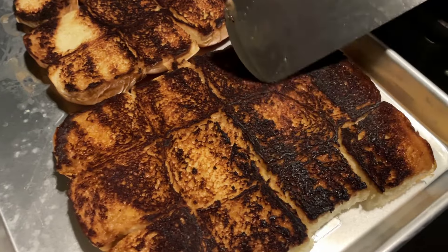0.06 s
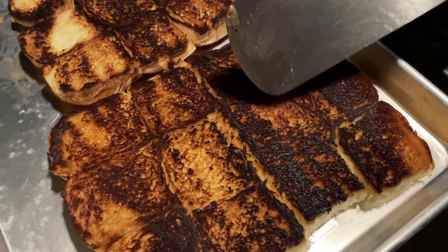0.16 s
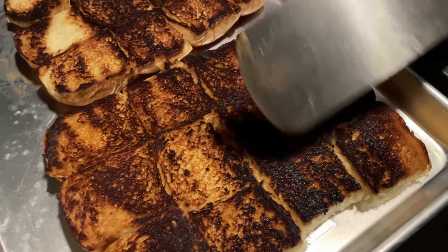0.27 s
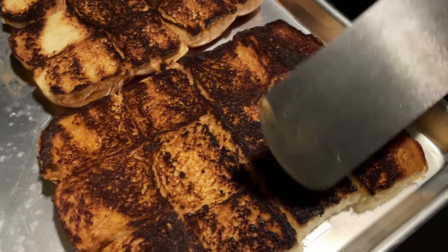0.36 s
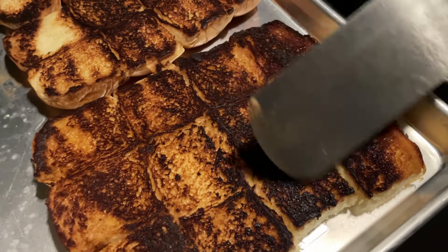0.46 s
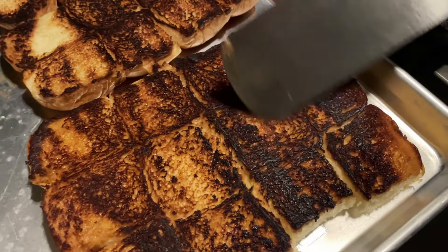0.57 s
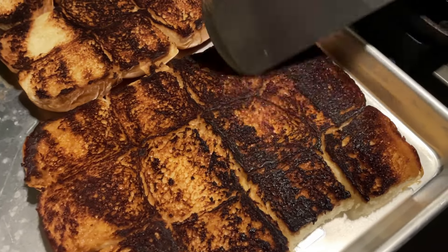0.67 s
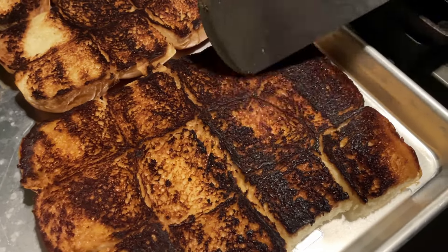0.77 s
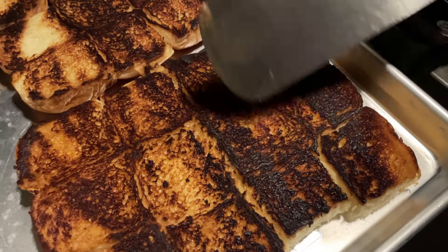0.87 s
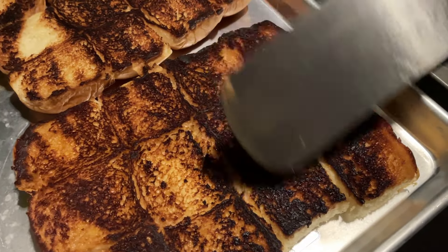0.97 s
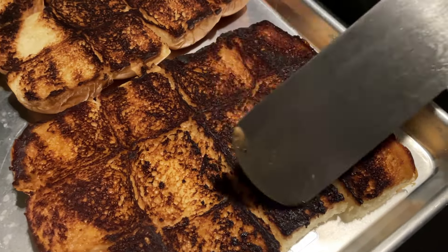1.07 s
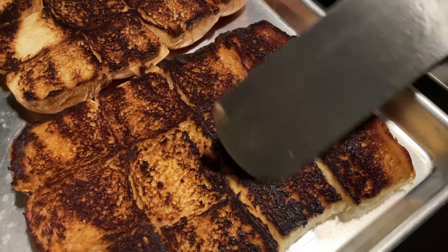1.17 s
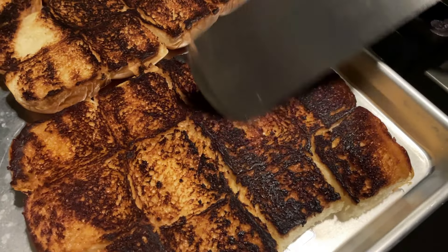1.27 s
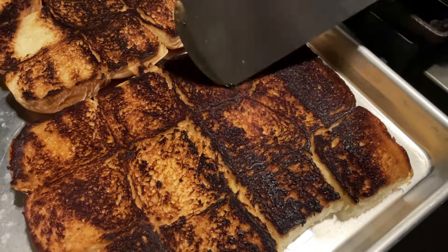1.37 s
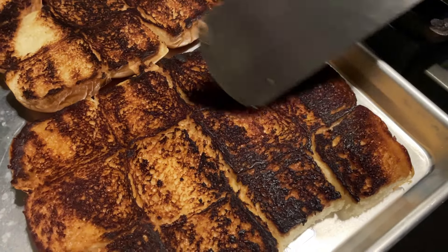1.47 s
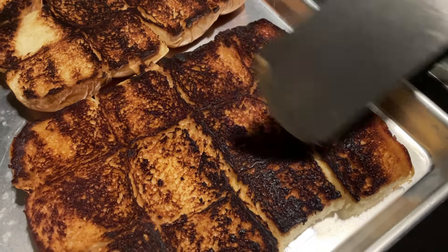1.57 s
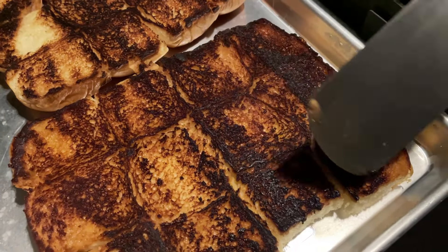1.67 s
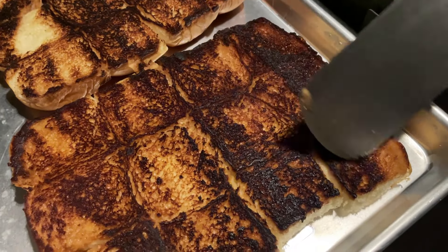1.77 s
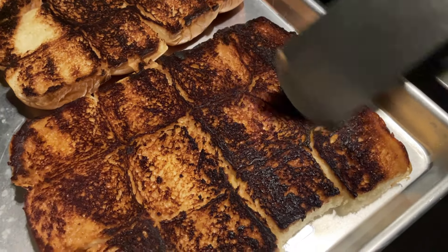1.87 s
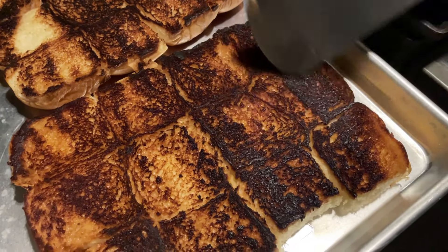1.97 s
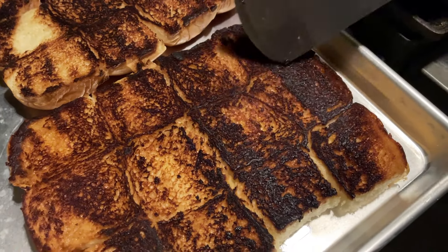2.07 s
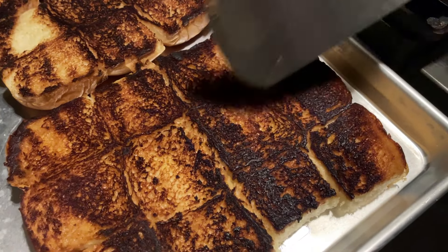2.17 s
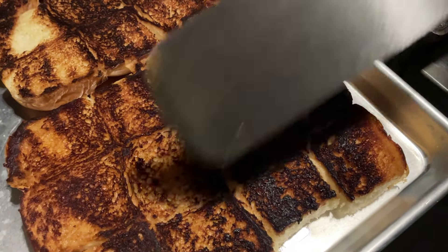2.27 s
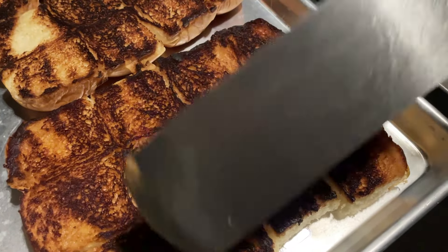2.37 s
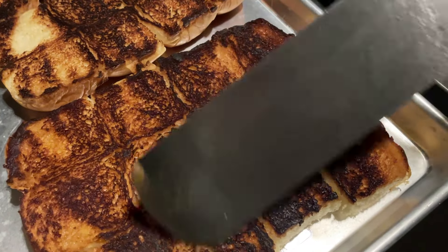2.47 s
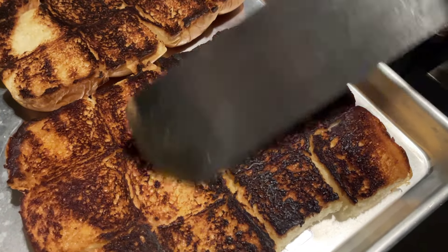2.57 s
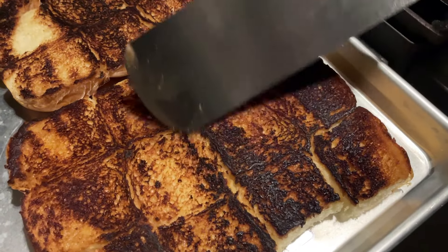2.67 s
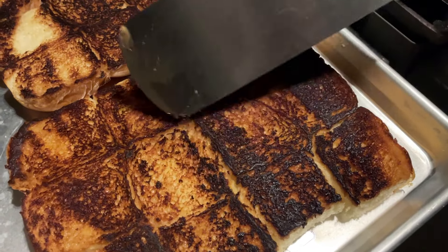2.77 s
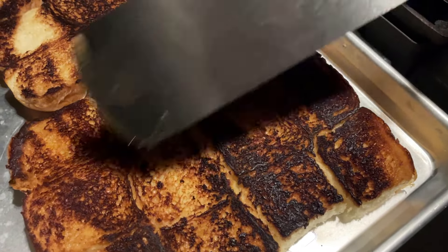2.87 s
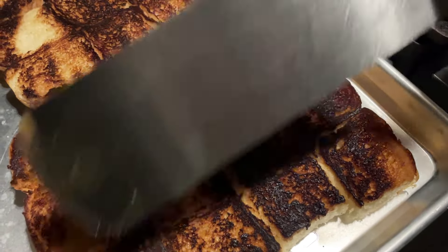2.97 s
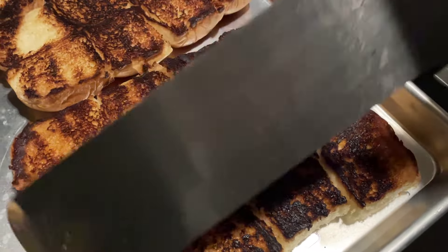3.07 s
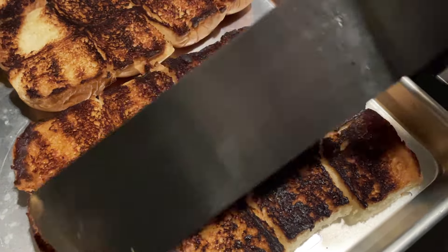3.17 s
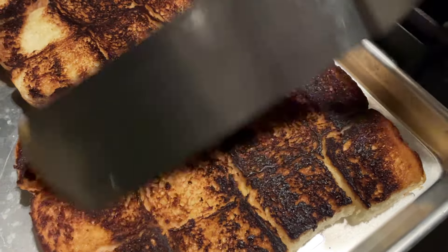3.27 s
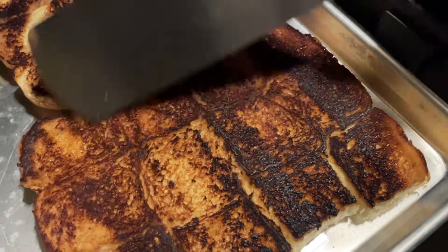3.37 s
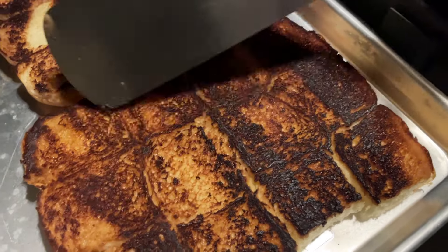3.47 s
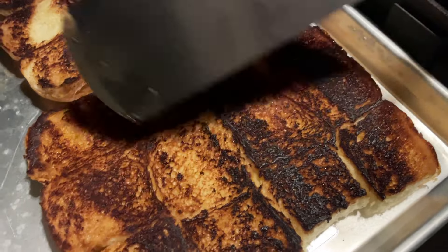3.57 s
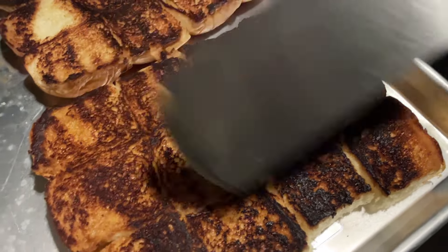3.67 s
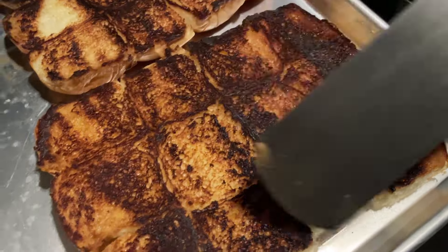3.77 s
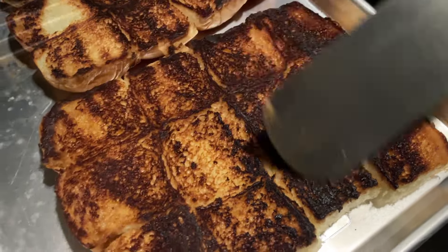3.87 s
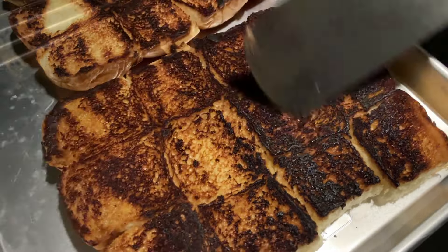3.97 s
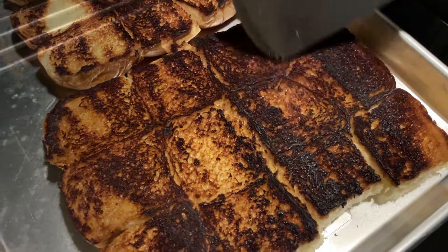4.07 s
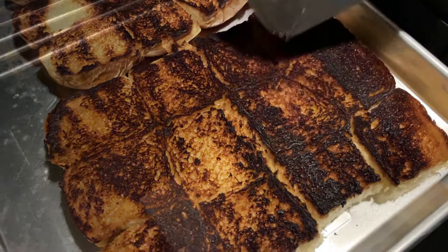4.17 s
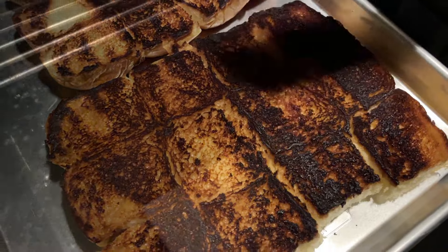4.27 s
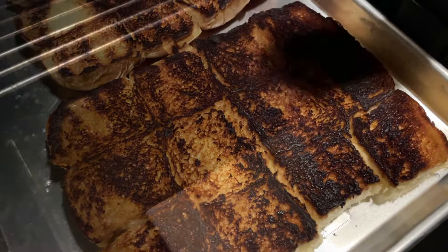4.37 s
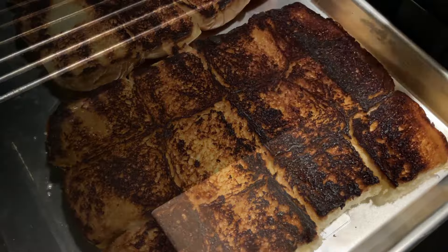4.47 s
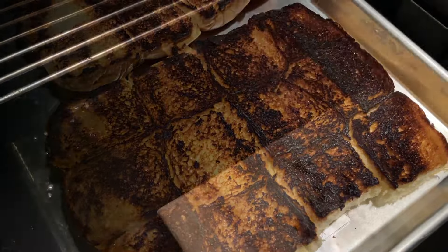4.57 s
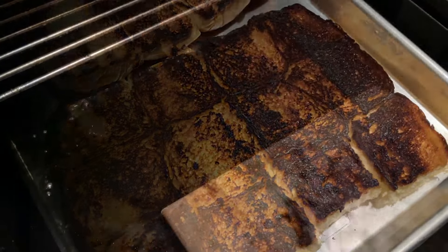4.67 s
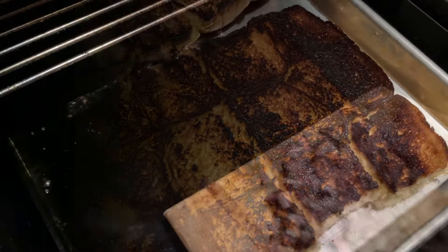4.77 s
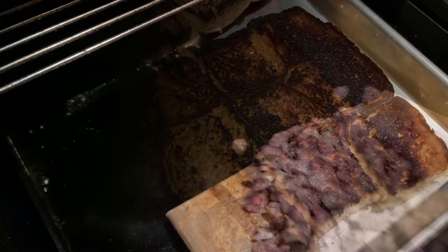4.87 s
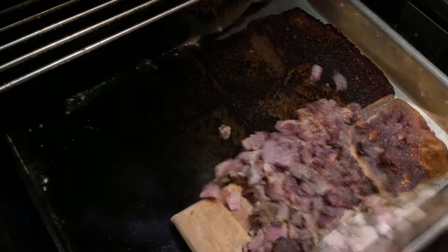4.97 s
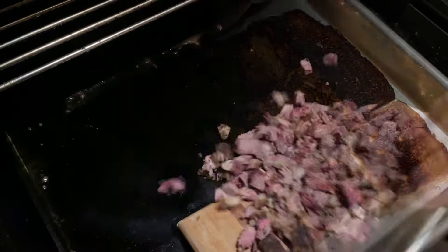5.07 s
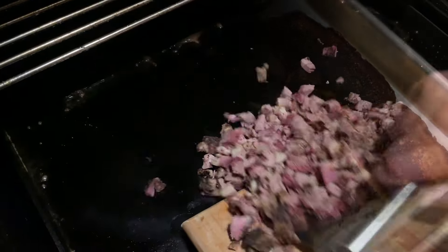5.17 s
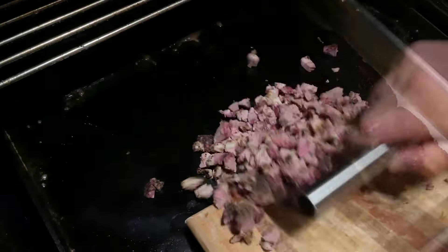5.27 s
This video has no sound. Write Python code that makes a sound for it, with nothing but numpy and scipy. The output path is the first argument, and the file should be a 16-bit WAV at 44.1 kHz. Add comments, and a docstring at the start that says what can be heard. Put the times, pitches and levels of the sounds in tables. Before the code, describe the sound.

Close stereo recording in a small, short-reverb kitchen. A long steel spatula scrapes burnt bread tops seven times, about every 0.6 seconds, with dry gritty crunch and a bright metallic ring. Soft dull bumps and faint knocks come between strokes over a low fluttering rumble. After the last scrape near 4 seconds a deep hum wavers, then a fine bright sizzle fades in by the end.

```python
"""A long steel spatula scrapes seven times over the burnt tops of bread rolls on a tray.
The crust breaks in countless tiny random snaps, which crunch through filters and ring the modes of the blade.
Random decaying reflections make a small kitchen; crumbs and knocks are short fading noises.
Under it lie a low rumble of filtered noise, soft thuds of damped sines and a deep sine hum that swells.
At the end a rustling sizzle of dense, filtered snaps fades in."""
import sys
import numpy as np
from scipy import signal
from scipy.fft import rfft, irfft, next_fast_len
from scipy.io import wavfile

SR = 44100
rng = np.random.default_rng(int(sys.argv[2]) if len(sys.argv) > 2 else 0)


def to_wav(s):
    """Save 16-bit WAV."""
    ch = np.atleast_2d(s).T  # columns
    pcm = np.round(np.clip(ch, -1, 1) * 32767)  # PCM
    wavfile.write(sys.argv[1], SR, pcm.astype(np.int16))


N = 234021
TIME = np.arange(N) / SR

# strokes of the blade: (landing [s], hardest push [s], lift-off [s], half-length of the push [s],
# bite on landing, negative if soft [dB], gliding level [dB], level at the push [dB],
# low crunch as the edge digs in [dB], flex feeding the low ring [dB], fall after lift-off [dB/s])
SCRAPE_STROKES = [(0.0, -0.012, 0.015, 0.011, 4.5, -37, -19.5, -1, -2.5, 302),
                  (0.544, 0.591, 0.66, 0.043, 1.5, -41, -27.5, 6.5, -1, 313.5),
                  (1.146, 1.279, 1.355, 0.061, -7, -42.5, -27, 10, -1, 328),
                  (1.782, 2.023, 2.032, 0.029, 5, -37.5, -35, 14, 1, 506),
                  (2.507, 2.614, 2.673, 0.017, 3.5, -30, -22.5, 0.5, -4, 296.5),
                  (3.172, 3.377, 3.4164, 0.085, 2.5, -34.5, -27, 11, -4.5, 374),
                  (3.859, 4.001, 4.035, 0.063, 0, -36.5, -31.5, 6, -1, 318)]
# strong soft bumps: (time [s], level [dB], pitch [Hz], level of the dull knock on top [dB])
STRONG_BUMPS = [(.114, -35.5, 211, -70), (.393, -38.5, 191, -54.5), (0.571, -35.5, 174, -66),
                (0.838, -36.5, 200, -56), (1.031, -43, 193, -56), (1.088, -37.5, 121, -49.5),
                (1.124, -37.5, 197, -62), (1.655, -35.5, 207, -58.5), (2.183, -34.5, 207, -61),
                (2.586, -37, 210, -70), (2.726, -35.5, 197, -48), (2.883, -40, 201, -58),
                (3.062, -36, 179, -77.5), (3.584, -39.5, 199, -64.5), (3.801, -38, 234.4, -56),
                (4.083, -39.5, 210, -66), (4.391, -42.5, 159, -68), (4.586, -44.5, 223, -61),
                (4.937, -42.5, 222, -54)]


def amp(db):
    """Decibels to gain."""
    return np.exp(np.asarray(db) * (np.log(10) / 20))


def unit(x):
    """Scales to an rms of one."""
    return x / np.sqrt(np.mean(x ** 2) + 1e-20)


def read(points, hz):
    """Reads a table on a log-frequency axis."""
    f, value = np.transpose(points)
    return np.interp(np.log(hz + 1), np.log(f + 1), value)


def follow(rows):
    """The columns of a curve table at every sample."""
    s, *columns = np.transpose(rows)
    return [np.interp(TIME, s, c) for c in columns]


def add(mix, s, sound):
    """Mixes a sound in at time s."""
    part = mix[max(round(s * SR), 0):][:len(sound)]
    part += sound[:len(part)]


def shape(x, gain):
    """Filters by a gain given as a function of frequency."""
    size = next_fast_len(N + 8192)
    spectrum = rfft(x, size) * gain(np.fft.rfftfreq(size, 1 / SR))
    return irfft(spectrum, size)[..., :N]


def colour(x, spectrum):
    """Filters by a spectrum table, keeping the power of white noise."""
    return shape(x, lambda hz: unit(amp(read(spectrum, hz))))


def wander(per_s):
    """A random curve of rms one, drawn through per_s random points a second."""
    knots = rng.standard_normal(8192)
    return unit(np.interp(TIME * per_s, np.arange(len(knots)), knots))


def swell(s, half_s):
    """A bell-shaped rise from 0 to 1 and back around time s."""
    return np.exp(-np.minimum(((TIME - s) / half_s) ** 2, 50))


def pair(x):
    """Blends two unrelated signals into ports that are partly alike."""
    # likeness of the two ports: (frequency [Hz], likeness [0 to 1])
    likeness = [(50, 0.98), (200, 0.92), (600, 0.065), (1500, 0.15), (3000, 0.31), (6500, 0.25),
                (8000, 0.94), (10500, 0.77), (14000, 0.97)]
    same = lambda hz: np.clip(read(likeness, hz), 0, 1)
    common = shape(x[0], lambda hz: np.sqrt((1 + same(hz)) / 2))
    apart = shape(x[1], lambda hz: np.sqrt((1 - same(hz)) / 2))
    return np.array([common + apart, common - apart])


def snaps(per_s, spread_db):
    """Two trains of tiny fractures at the same random instants, each with its own random strengths."""
    happens = rng.random(N) < per_s / SR
    size = amp(spread_db * np.minimum(rng.exponential(1, N), 4)) * happens
    return unit(size * rng.standard_normal((2, N)))


def background(flutter_db=1.0, middle_db=1.0):
    """Filtered noise: low fluttering rumble, an uneven middle range and a faint hiss above."""
    # background spectrum: (frequency [Hz], relative density [dB/Hz])
    floor_spectrum = [(15, -52), (25, -38), (43, -1.5), (97, 2.5), (206, -4.5), (405, -18), (439, -20.5),
                      (863, -22.5), (1070, -26), (1290, -30), (1610, -32.5), (5730, -49), (8590, -47),
                      (14800, -48), (16000, -70.5)]
    # background course: (time [s], level [dB], change of level of the deep rumble [dB])
    floor_course = [(0, -46.5, -2.5), (2.4, -48, 0), (3.7, -47.5, -1), (4.7, -51.5, -5.5),
                    (5.3, -52.5, -16)]
    level_db, rumble_db = follow(floor_course)
    noise = pair(colour(rng.standard_normal((2, N)), floor_spectrum))
    rumble = shape(noise, lambda hz: 1 / (1 + (hz / 140) ** 6))
    hiss = shape(noise, lambda hz: 1 - 1 / (1 + (hz / 1400) ** 6))
    middle = noise - rumble - hiss
    rumble = rumble * amp(rumble_db + flutter_db * wander(13))
    middle = middle * amp(middle_db * wander(35))
    return amp(level_db) * (rumble + middle + hiss)


def hum(waver_db=2.0):
    """A wavering deep sine swells, then climbs a little as it fades."""
    # hum course: (time [s], pitch [Hz], level before the waver [dB])
    hum_course = [(3.3, 47.3, -73), (3.75, 46.6, -55.5), (3.92, 46.9, -42), (4.1, 48.94, -40.5),
                  (4.48, 48.46, -42), (4.6, 50.2, -49.5), (4.9, 48.8, -46.5), (5.08, 56.2, -57.5)]
    hz, db = follow(hum_course)
    tone = np.sqrt(2) * np.sin(2 * np.pi * np.cumsum(hz) / SR)
    # a half-second fade-in ends at the first row
    fade_in = np.clip(TIME - hum_course[0][0] + .5, 0, .5) * 2
    return amp(db + waver_db * wander(8.7)) * tone * fade_in


def sizzle():
    """Fine bursts of frying fat fade in and hold; a resonant patter of the same bursts crests earlier."""
    # sizzle spectrum: (frequency [Hz], relative density [dB/Hz])
    sizzle_spectrum = [(100, -25), (250, -10.5), (650, -17), (1400, -11.5), (3000, -9.5), (6000, -6),
                       (9000, 1.5), (13500, 3), (16000, -3.5)]
    # resonances of the patter: (frequency [Hz], width [Hz], relative level [dB])
    patter_modes = [(1455, 100, 7.5), (1810, 370, -11), (2250, 390, -2.5), (2570, 110, -0.5),
                    (3300, 170, -1), (4600, 2600, -19)]
    full_s, full_db, rise_db_per_s = 5.188, -45.5, 77
    crest_s, crest_db, patter_rise_db_per_s, patter_fall_db_per_s = 5.064, -51, 69, 62

    sizzle_db = full_db - rise_db_per_s * np.maximum(full_s - TIME, 0)
    before_db = patter_rise_db_per_s * (crest_s - TIME)
    after_db = patter_fall_db_per_s * (TIME - crest_s)
    patter_db = crest_db - np.maximum(before_db, after_db)

    def resonances(hz):
        """Sums the resonant peaks into one gain curve."""
        return unit(sum(amp(db) / (1 + (2 * (hz - f) / width) ** 2) for f, width, db in patter_modes))

    bursts = pair(snaps(per_s=11000, spread_db=1.0))
    return amp(sizzle_db) * colour(bursts, sizzle_spectrum) + amp(patter_db) * shape(bursts, resonances)


def kitchen(x, wet_db=-11.5):
    """Dense random reflections from hob and walls, each pitch range dying at its own rate."""
    # decay of the kitchen: (frequency [Hz], time to fall by 60 dB [s])
    room_decay = [(300, 0.13), (1500, 0.17), (5000, 0.26), (14000, 0.17)]
    taps = rng.standard_normal((2, SR // 2)) * (TIME[:SR // 2] > .003)  # reflections start after 3 ms
    hz, t, z = signal.stft(taps, SR, nperseg=256)
    fade = np.exp(-np.log(1000) * t / read(room_decay, hz)[:, None])
    tail = signal.istft(z * fade, SR)[1]
    tail /= np.linalg.norm(tail[0])
    return amp(wet_db) * pair(signal.fftconvolve(x[None], tail, axes=1)[:, :N])


def bump(hz, rise_s=0.0046):
    """A dull, heavily damped thud of a few cycles."""
    t = TIME[:SR // 8]
    return t / rise_s * np.exp(1 - t / rise_s) * np.sin(2 * np.pi * hz * t)


def bumps(spread_db=6.0, spread_octaves=0.67):
    """Strong damped thuds, and weaker random ones scattered among them until the last lift-off."""
    small_per_s, small_db, small_hz = 3.5, -45, 210  # centres of the random spread
    out = np.zeros(N)
    for s, db, hz, _ in STRONG_BUMPS:
        add(out, s, amp(db) * bump(hz))
    last_lift_s = SCRAPE_STROKES[-1][2]
    for k, (late, size, pitch) in enumerate(rng.uniform(-1.1, 1, size=(64, 3))):
        s = (k + .5 + late / 2) / small_per_s
        if s < last_lift_s:
            thud = bump(small_hz * 2 ** (spread_octaves * pitch))
            add(out, s, amp(small_db + spread_db * size) * thud)
    return out


def knocks(fade_s=.011, corner_hz=1300):
    """The faint knock that comes with a strong bump: fading noise with its treble rolled off."""
    out, t = np.zeros(N), TIME[:SR // 8]
    for s, _, _, db in STRONG_BUMPS:
        add(out, s, amp(db) * np.exp(-t / fade_s) * rng.standard_normal(len(t)))
    return shape(out, lambda hz: unit(1 / (1 + (hz / corner_hz) ** 4)))


def crumbs():
    """Loose crumbs land with a bright tick or a short brushing skitter of fading noise."""
    # crumbs: (time [s], level before the treble filter [dB], fading time [s])
    crumb_hits = [(.261, -50, 0.058), (2.926, -50.5, 0.0019), (4.557, -59.5, 0.0011)]
    out, t = np.zeros(N), TIME[:SR // 4]
    for s, db, fade_s in crumb_hits:
        fade = np.exp(-np.minimum(t / fade_s, 20))
        add(out, s, amp(db) * fade * rng.standard_normal(len(t)))
    return shape(out, lambda hz: hz / (hz + 2500))


def stroke_controls():
    """Each stroke lands with a bite or softly, glides, swells to one hard push and lifts off; tone follows."""
    # light grazes of the blade: (time [s], level [dB], fading time [s])
    light_grazes = [(0.112, -45.5, 0.016), (0.765, -65.5, 0.0098), (1.427, -57, 0.008),
                    (3.481, -53, 0.0078)]
    land_rise_s, bite_fade_s = 0.0085, .02  # the edge lands fast and its bite or softness soon fades
    dig_lead_s, dig_s = 0.035, 0.11  # the edge digs in just before the hardest push
    push_flex_db = -1  # pushing holds back the low ring
    lift_top_db, lift_low_db, lift_s = -1.5, 12.5, 0.032  # the scraping turns duller as the edge lifts

    level, pressure_db, flex_db, bright_db = np.zeros((4, N))
    for (land_s, push_s, off_s, half_s, bite_db, glide_db, push_db,
         dig_db, ring_db, fall_db_per_s) in SCRAPE_STROKES:
        age = np.maximum(TIME - land_s, 0)
        lifted = np.maximum(TIME - off_s, 0)
        away = np.minimum(lifted / lift_s, 1)
        push = swell(push_s, half_s)
        contact = np.clip((TIME - land_s) / land_rise_s + .5, 0, 1) * (lifted < .3)
        stroke_db = glide_db + (push_db - glide_db) * push
        stroke_db += bite_db * np.exp(-age / bite_fade_s) - fall_db_per_s * lifted
        level += contact * amp(stroke_db)
        pressure_db += contact * (dig_db * swell(push_s - dig_lead_s, dig_s) + lift_low_db * away)
        flex_db += contact * (ring_db + push_flex_db * push)
        bright_db += contact * lift_top_db * away
    for s, db, fade_s in light_grazes:
        add(level, s, amp(db) * np.exp(-TIME[:SR // 4] / fade_s))
    return level, pressure_db, flex_db, bright_db


def dense_modes(x, t60=0.11, direct=0.63):
    """Countless weak, overlapping modes of blade and tray smear each snap into a short metallic rasp."""
    t = TIME[:SR // 8]
    body = rng.standard_normal((2, len(t))) * np.exp(-np.log(1000) * t / t60)
    body /= np.linalg.norm(body, axis=1, keepdims=True)
    rasp = signal.oaconvolve(x, body, axes=1)[:, :N]
    return (direct * x + rasp) / np.hypot(1, direct)


def blade(drive, touch, shift_db=4.0, bend_hz=6.5, damping=1.14, tilt_db_per_octave=-0.5, spot_s=0.14):
    """The snaps ring the steel; the bread pulls its pitch about, and the moving contact shifts the mode balance."""
    # modes of the blade: (frequency [Hz], level before the tilt [dB], 60 dB fall before the damping [s])
    blade_modes = [(1401, 0, .2), (1445, -8, .06), (1560, -6, .04), (1620, 0, .22), (2282, -10.5, .05),
                   (2590, -21, .25), (3696, -7, .27), (3938, -8, .2), (4405, -11.5, .32), (4935, -16, .12),
                   (5114, -12, .07), (5950, -15, .16), (6385, -11, .16), (6947, -3, .17), (7421, -5, .14),
                   (7535, -8, .04), (7745, -1, .11), (8126, -5, .14), (8538, -7, .13), (10665, -9, .11),
                   (11704, -9, .11), (11902, -5, .09), (12150, -9, .12), (12742, -6, .12), (12977, -3, .1),
                   (13287, -7, .07), (13364, -7, .07), (13725, -7, .1), (14105, -12, .09),
                   (15126, -14, .09)]
    # places along the strokes where the edge feeds one mode more or less:
    # (time [s], mode frequency [Hz], change of level [dB])
    contact_spots = [(.01, 6947, 13), (.11, 1620, 3.5), (.6, 1620, -1), (1.27, 3938, 9.5), (2.04, 4405, 10),
                     (3.341, 7745, 11.5), (4.03, 3938, 2.5)]
    mode_hz, mode_db, _ = np.transpose(blade_modes)
    bend = np.exp(2j * np.pi * np.cumsum(touch * bend_hz * wander(70)) / SR)
    # five feeds with their own level wander, shared out among the modes
    feeds = [drive / bend * unit(amp(shift_db * wander(11))) for _ in range(5)]
    spot_db = np.zeros((len(mode_hz), N))
    for s, hz, change_db in contact_spots:
        spot_db[np.argmin(abs(mode_hz - hz))] += change_db * swell(s, spot_s)

    out = np.zeros(N, complex)
    for k, (hz, db, t60) in enumerate(blade_modes):
        feed = feeds[k % len(feeds)] * amp(spot_db[k])
        decay = damping * np.log(1000) / (t60 * SR)
        pole = np.exp(2j * np.pi * hz / SR - decay)
        ring = signal.lfilter([2 * np.sqrt(decay)], [1, -pole], feed + 1e-18)
        out += amp(db + tilt_db_per_octave * np.log2(hz / 4000)) * ring
    return (out * bend).real / np.linalg.norm(amp(mode_db))


def long_ring(drive, hz=1319, t60=0.54, db=-22):
    """One weak, lightly damped mode sings on between the strokes."""
    t = TIME[:SR]
    mode = np.sin(2 * np.pi * hz * t) * np.exp(-np.log(1000) * t / t60)
    return amp(db) * signal.oaconvolve(drive, mode / np.linalg.norm(mode))[:N]


def scraping(ring_db=0.32, crunch_db=-2.5, clump_db=1.0, patchy_db=2.0, firm_db=-40):
    """Clumps of snaps under the edge; pressure deepens the crunch, flex feeds the low ring, lifting dulls it."""
    # spectrum of the breaking crust: (frequency [Hz], relative density [dB/Hz])
    crust_spectrum = [(330, -11), (500, -13), (820, -6), (1150, -17.5), (1600, -13.5), (2300, -5),
                      (2900, -9.5), (3700, -1.5), (5500, -12), (7500, -0.5), (9500, -1.5), (13000, -2),
                      (16000, -11)]
    level, pressure_db, flex_db, bright_db = stroke_controls()
    clumps = unit(amp(clump_db * wander(220) + patchy_db * wander(55)))
    drive = snaps(per_s=8000, spread_db=-0.5) * level * clumps
    low = shape(drive, lambda hz: 1 / (1 + (hz / 1060) ** 8))
    bending = shape(drive, lambda hz: 1 / (1 + ((hz - 1520) / 280) ** 4))
    top = shape(drive, lambda hz: 1 - 1 / (1 + (hz / 9500) ** 8))
    for band, db in (low, pressure_db), (bending, flex_db), (top, bright_db):
        relative_db = db - np.average(db, weights=level)  # only the change around its mean counts
        drive = drive + band * (amp(relative_db) - 1)
    crunch = pair(colour(dense_modes(drive), crust_spectrum))
    touch = level / (level + amp(firm_db))  # 0 in the air, towards 1 pressed on the bread
    return amp(crunch_db) * crunch + amp(ring_db) * blade(drive[1], touch) + long_ring(drive[0])


def scene():
    """Scraping, crumbs and knocks in the kitchen, over bumps, background, hum and sizzle."""
    near = scraping() + crumbs() + knocks()
    return near + kitchen(near[0]) + bumps() + background() + hum() + sizzle()


def record(dry):
    """Two microphone ports that differ in phase and level; then the band limit."""
    # phase between the ports: (frequency [Hz], lead of the left [rad])
    port_lead = [(60, 0), (600, 0.5), (1600, -0.2), (3300, 0.8), (5200, 0.3), (6000, -1.8), (7000, -1.9),
                 (8500, -3.1), (11000, -4.6), (13500, -6.28), (16000, -6.28)]
    # level between the ports: (frequency [Hz], left minus right [dB])
    port_pan = [(50, 4), (200, 2), (700, 3), (1500, 3.5), (3700, 5), (5500, 1), (7500, 2), (9000, -1),
                (16000, 1)]
    edge_hz = 15800
    # each port takes half of the difference
    port = lambda hz: amp(read(port_pan, hz) / 2) * np.exp(.5j * read(port_lead, hz))
    left = shape(dry[0], port)
    right = shape(dry[1], lambda hz: 1 / port(hz))
    lowpass = signal.firwin(511, edge_hz, window=("kaiser", 9), fs=SR)
    return signal.oaconvolve(np.array([left, right]), lowpass[None], "same")


dry = scene()
out = record(dry)
to_wav(out)
```